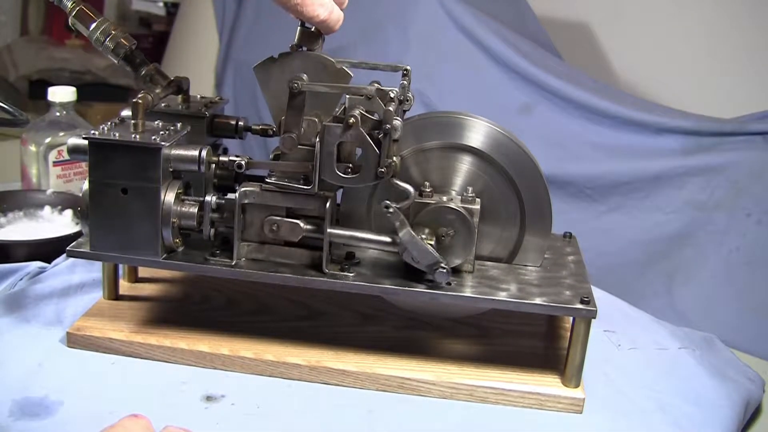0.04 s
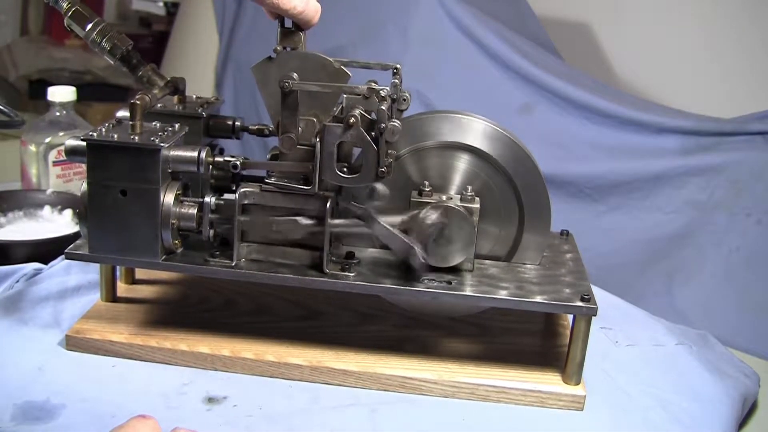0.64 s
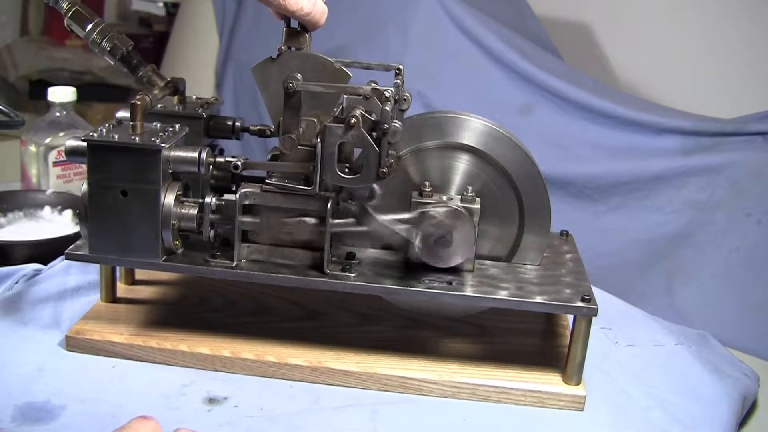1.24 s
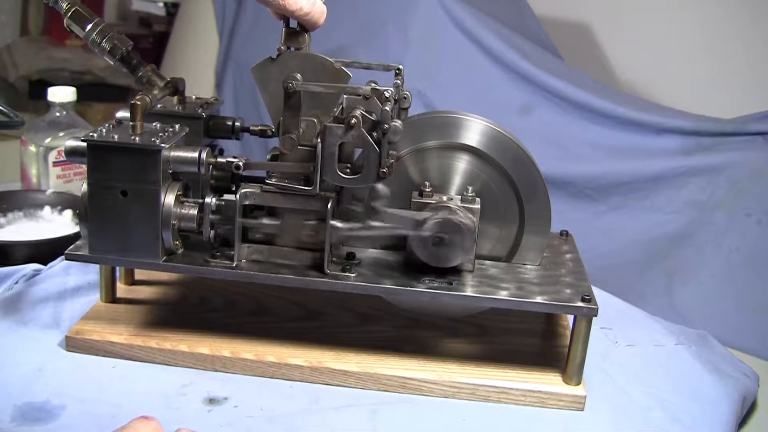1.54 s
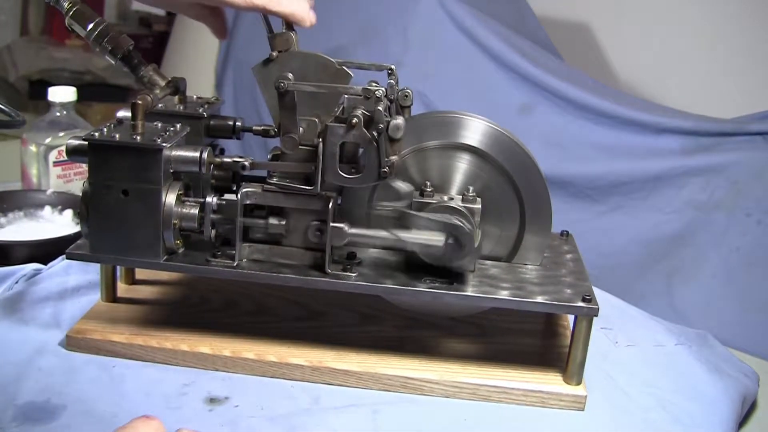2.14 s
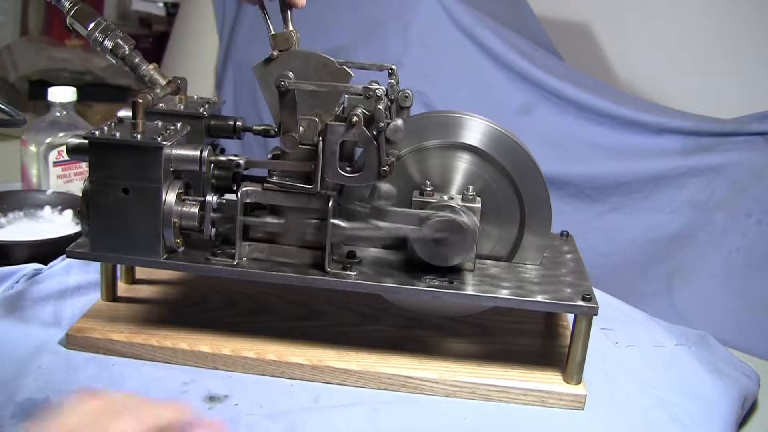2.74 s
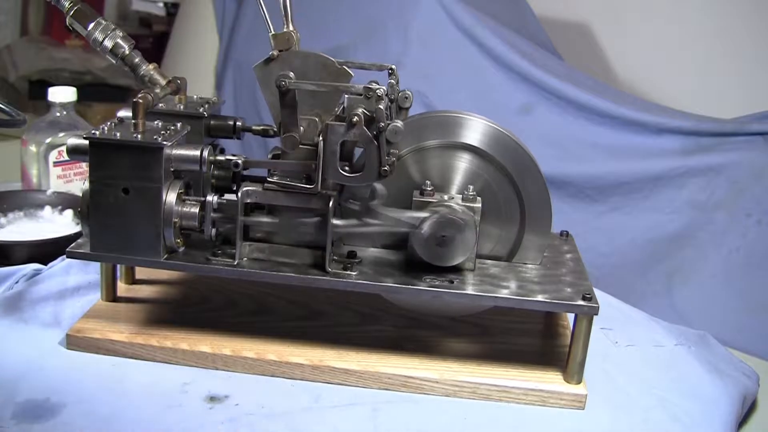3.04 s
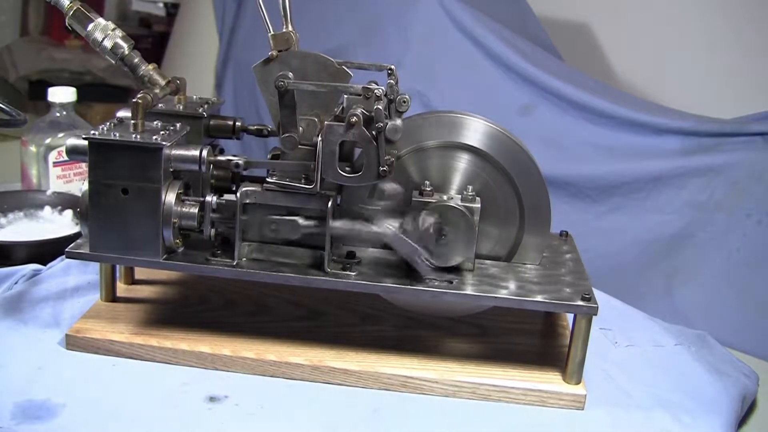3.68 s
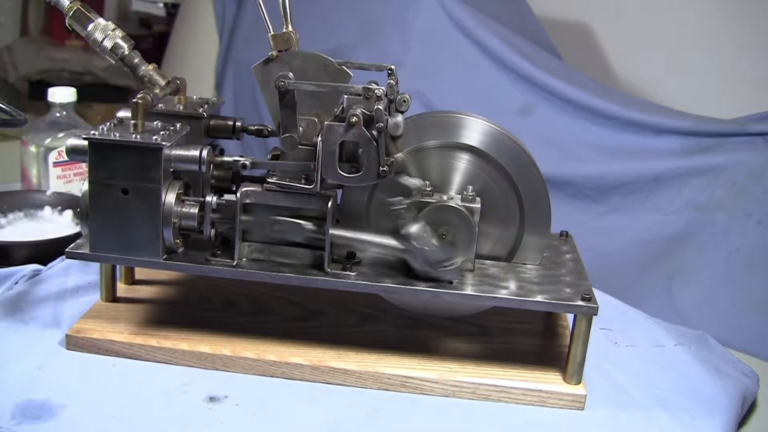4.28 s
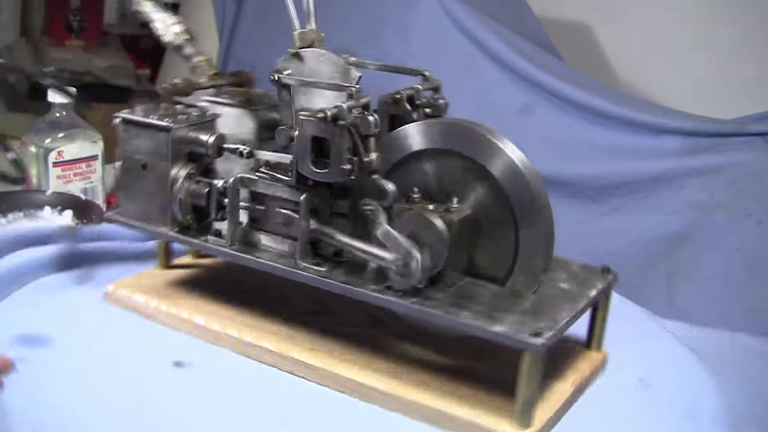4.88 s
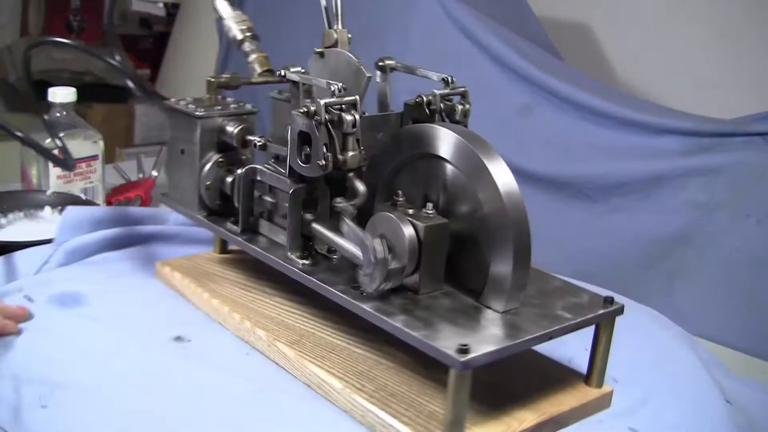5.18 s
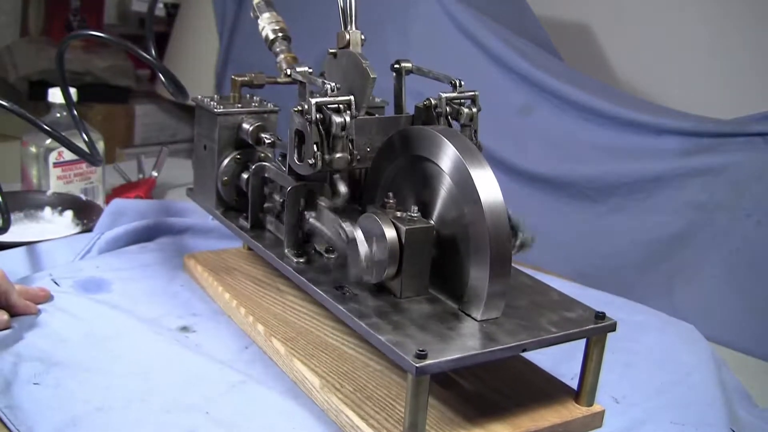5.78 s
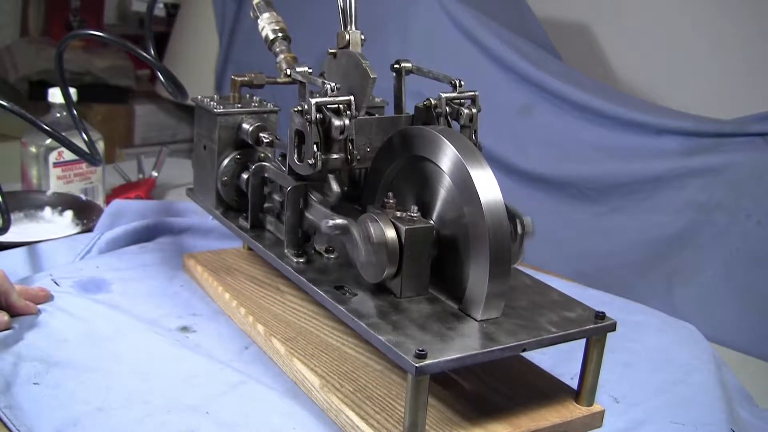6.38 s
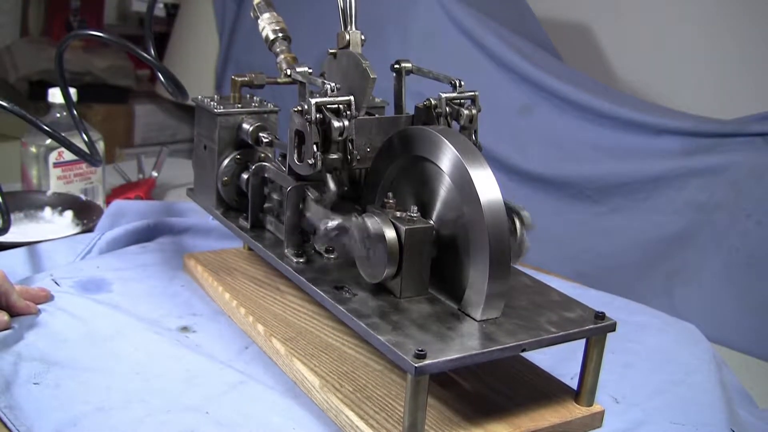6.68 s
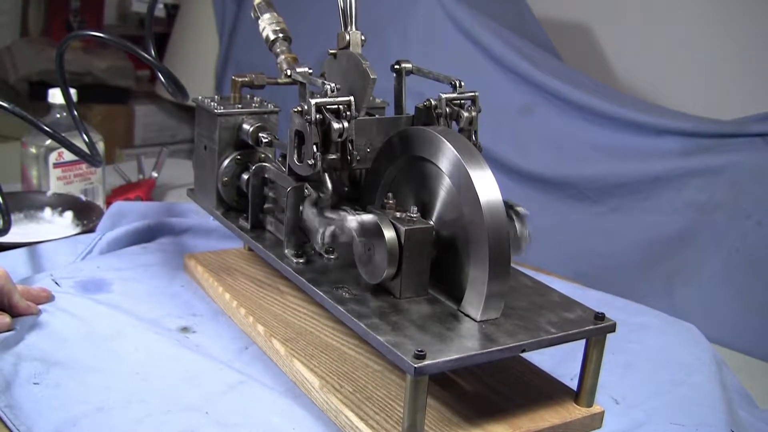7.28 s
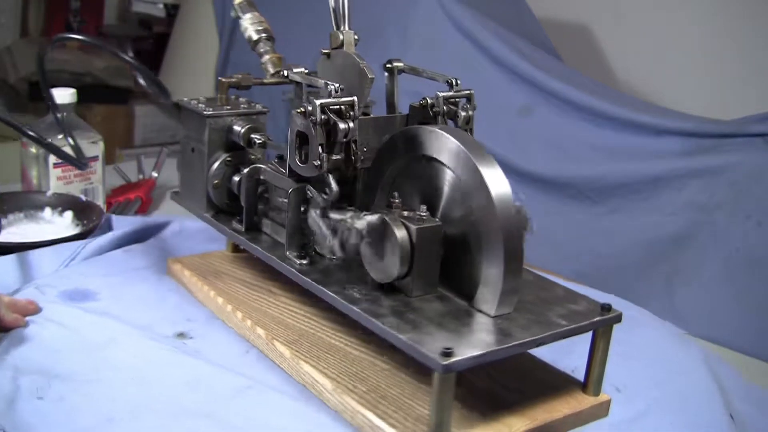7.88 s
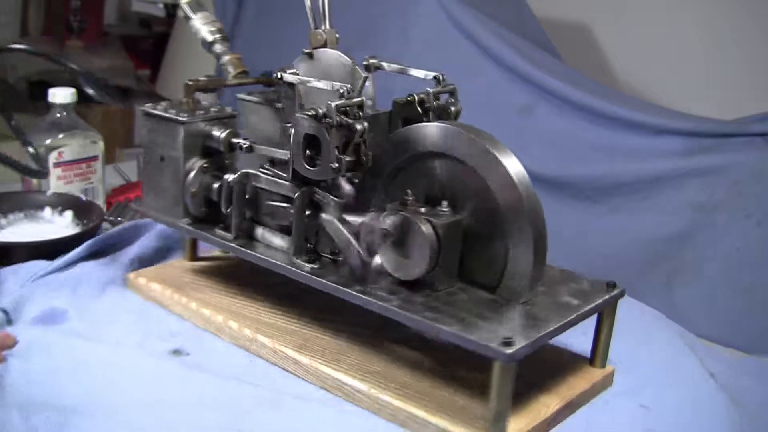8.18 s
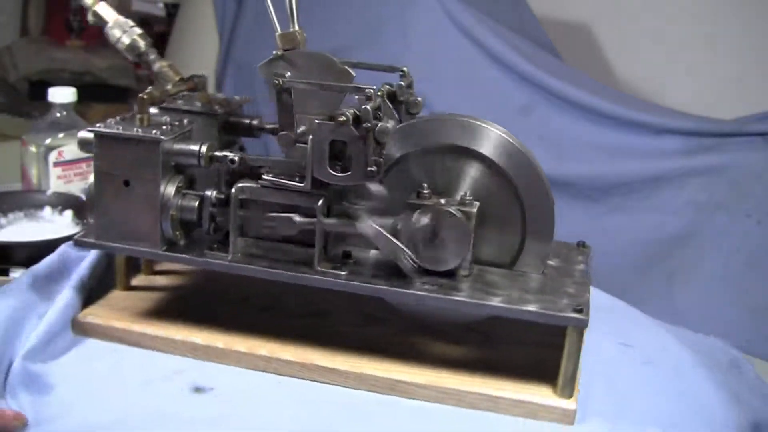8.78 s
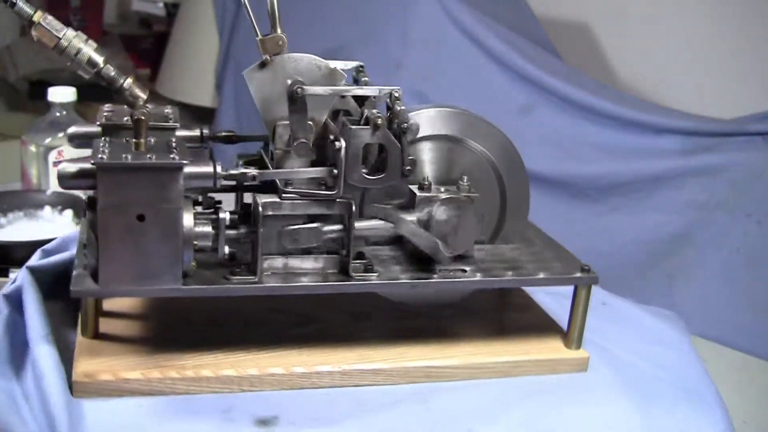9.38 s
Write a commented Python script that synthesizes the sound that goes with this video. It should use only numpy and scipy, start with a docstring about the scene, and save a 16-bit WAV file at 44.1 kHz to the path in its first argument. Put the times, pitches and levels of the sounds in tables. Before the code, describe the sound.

A small steam engine hisses, starts and runs with fast regular chuffs and metallic knocks over a steady steam leak.

```python
"""First comes a hiss: a model steam engine is stalled on a cloth-covered table in a small room.
It twitches once, then starts chuffing and picks up to about 3.5 turns a second. Twice a turn the
exhaust opens with a bark and a fading puff, then snaps shut with a sharp spit. The loose rod knocks
twice a turn too, ringing the metal bed plate under the engine. Dull rubs are heard as the reversing
lever is shifted and, later, as the base is swivelled on the cloth."""
import sys
import numpy as np
from scipy import signal
from scipy.fft import rfft, irfft, next_fast_len
from scipy.io import wavfile
from scipy.ndimage import map_coordinates

SR = 44100
rng = np.random.default_rng(int(sys.argv[2]) if len(sys.argv) > 2 else 0)


def master(y):
    """Save y as 16-bit WAV."""
    cut = np.clip(np.atleast_2d(y).T, -1, 1)
    pcm = np.round(cut * 32767)  # scale
    wavfile.write(sys.argv[1], SR, pcm.astype(np.int16))


N = 420273
T = np.arange(N) / SR
CUTOFF_HZ = 15900
FACING_PIPE_DB = 4   # boost of the exhaust pipe when swivelled fully toward the listener

# The two ends of the cylinder. Each row: puff level in dB, puff fade in dB per second, spit level
# in dB, half the spit's length in turns, squeak share in dB, spray share in dB.
CYLINDER_ENDS = [(-21.5, 174, -10, 0.0082, -5, -8.5), (-20.5, 149, -12.2, 0.014, -11, -10)]
# The stalled piston's one twitch: opening time in seconds, shutting time in seconds, puff level in dB.
TWITCH = (0.022, 0.117, -24)


def from_db(db):
    """Turn decibels into a gain."""
    return 10 ** (np.asarray(db) / 20)


def rms_one(x):
    """Scale a signal to an average power of one."""
    return x / np.sqrt(np.mean(x ** 2) + 1e-20)


def level(rows):
    """A gain that follows rows of time in seconds and level in dB."""
    return from_db(np.interp(T, *np.transpose(rows)))


def cut(x, hz, kind, order=2):
    """Keep the "low" or the "high" side of a frequency."""
    return signal.sosfilt(signal.butter(order, min(hz, .45 * SR), kind, fs=SR, output="sos"), x)


def wander(hz, count=N):
    """A random wobble, mostly slower than hz."""
    return rms_one(cut(rng.standard_normal(count), hz, "low"))


def noise(colour):
    """Noise with a given colour (its strength at each frequency), fading below the lowest row."""
    hz, db = np.transpose(colour)
    size = next_fast_len(N)
    f = np.maximum(np.fft.rfftfreq(size, 1 / SR), 1)
    gain = from_db(np.interp(np.log(f), np.log(hz), db)) * np.minimum(f / hz[0], 1) ** 2
    return rms_one(irfft(rfft(rng.standard_normal(size)) * gain, size)[:N])


def flutter(rate_hz, depth_db):
    """A randomly wavering gain."""
    return rms_one(from_db(depth_db * wander(rate_hz)))


def gate(t, start, end, rise, fall):
    """A gain that opens smoothly at start and dies away after end."""
    opening = np.sin(np.pi / 2 * np.clip((t - start) / rise, 0, 1)) ** 2
    return opening * np.exp(-np.maximum(t - end, 0) / fall)


def around(s):
    """The samples near a moment."""
    return slice(max(int((s - .05) * SR), 0), int((s + .25) * SR))


def jet(colour, likeness):
    """A steam jet is spread out: each ear hears some shared noise and some of its own."""
    shared = np.sqrt(likeness) * noise(colour)
    return shared + np.sqrt(1 - likeness) * np.array([noise(colour), noise(colour)])


def stalled_hiss():
    """Steam blows past the stalled piston until the engine starts."""
    # Each row: time in seconds, level in dB.
    loudness = [(0, -32.5), (.1, -29), (.65, -28), (.73, -59)]
    # Each row: frequency in Hz, strength in dB.
    colour = [(130, -12.5), (900, -5.5), (1700, 4.5), (2600, -1), (4500, -10.5), (7500, 1), (14500, -3)]
    return level(loudness) * jet(colour, likeness=0.51)


def seal_leak():
    """Steam leaks all the time through the seals around the rods."""
    # Each row: time in seconds, level in dB.
    loudness = [(.6, -35.5), (2, -35), (4.5, -36), (5.8, -31.5), (7.8, -31), (8.6, -35)]
    # Each row: frequency in Hz, strength in dB.
    colour = [(60, -33), (130, 0.5), (300, -6), (1100, -2), (1900, 5), (5000, 2), (7300, 8.5), (9800, 0),
              (14500, -1)]
    return level(loudness) * jet(colour, likeness=0.19)


def speed(s):
    """The flywheel's speed: uneven at first, steady once the lever is shifted."""
    # Each row: time in seconds, turns per second.
    speeds = [(0.52, 0.0), (0.72, 3.29), (0.95, 3.38), (1.25, 2.99), (1.42, 2.66), (1.6, 2.98), (1.8, 2.61),
              (2.0, 3.2), (2.4, 3.58), (3.2, 3.58), (4.2, 3.6), (6.0, 3.54), (8.0, 3.46), (9.5, 3.32)]
    return np.interp(s, *np.transpose(speeds))


def at_turn(turns, first_shut_s=.696):
    """The moment when the crank has made this many turns since the first port shut."""
    t = np.arange(N + SR) / SR
    angle = np.cumsum(speed(t)) / SR
    return np.interp(turns + np.interp(first_shut_s, t, angle), angle, t)


def port_timing(end, turn_count=31, lever_shift_s=2.1):
    """The crank angles, in turns, at which one end's port (its steam outlet) opens and shuts."""
    # Each row is one end, in turns: where it shuts, how long it is open before and after the shift.
    valve = [(0, .225, .262), (.503, .22, .23)]
    shuts_at, open_before, open_after = valve[end]
    shuts = np.arange(turn_count) + shuts_at
    return shuts - np.where(at_turn(shuts) < lever_shift_s, open_before, open_after), shuts


def exhaust_strokes():
    """Two strokes a turn. Each row: cylinder end, opening and shutting times in seconds."""
    return [(end, opens, shuts) for end in (0, 1)
            for opens, shuts in zip(*map(at_turn, port_timing(end)))]


def opening_s(opens, turns):
    """The slower the crank, the longer the port takes to open."""
    return turns / max(speed(opens), 1)


def wetness_db(s, cold_db=2.5, drying_s=1.18):
    """Water in the cold cylinder clears as it warms up."""
    return cold_db * np.exp(-s / drying_s)


def swivel(s):
    """How far the exhaust is turned toward the listener."""
    # Each row: time in seconds, share from 0 to 1.
    facing = [(4.7, 0.34), (5.7, 0.86), (8, 0.97), (8.7, 0.16)]
    return np.interp(s, *np.transpose(facing))


def sliding(strokes, lead_s=0.036, idle_db=-11, thrum_hz=136):
    """The sliding parts rumble and the table thrums, most while steam drives the piston."""
    # Each row: time in seconds, level in dB at full push.
    rumble_levels = [(.1, -44), (.2, -48), (.55, -44), (1.4, -35.5), (1.8, -42), (2.3, -38), (4.5, -38.5),
                     (6, -34.5), (8, -35), (9.53, -39)]
    thrum_levels = [(.5, -49.5), (1.4, -43.5), (5, -52)]
    # Each row: frequency in Hz, strength in dB.
    rumble_colour = [(45, -30), (75, -16), (102, -5.5), (135, 2), (190, -2), (450, -5.5), (1100, -8.5),
                     (2000, -20)]
    push = np.full(N, from_db(idle_db))
    for opens, shuts in [row[1:] for row in strokes] + [TWITCH[:2]]:
        near = around(opens)
        push[near] += gate(T[near], opens - lead_s, shuts, rise=0.045, fall=0.002)
    thrum = rms_one(np.sin(2 * np.pi * thrum_hz * T) * wander(thrum_hz / 6))
    return push * (level(rumble_levels) * noise(rumble_colour) + level(thrum_levels) * thrum)


def barks(strokes, bark_db=-31, hold_s=0.0038):
    """The first rush through a barely open port makes the exhaust pipe give a throaty bark."""
    rush = np.zeros(N)
    for opens in [row[1] for row in strokes] + [TWITCH[0]]:
        near, rise = around(opens), opening_s(opens, turns=0.018)
        db = bark_db + wetness_db(opens) + FACING_PIPE_DB * swivel(opens)
        rush[near] += from_db(db) * gate(T[near], opens, opens + rise + hold_s, rise, fall=.017)
    bright = cut(rng.standard_normal(N), 1400, "high", order=4)
    return rush * rms_one(cut(bright, 2500, "low", order=4))


def whistle(strokes, centre_hz, spread, width_hz):
    """A hollow note of the exhaust passage, on a new pitch with every stroke."""
    puff = np.searchsorted(sorted(opens for _, opens, _ in strokes), T)
    pitch = centre_hz * np.exp(spread * rng.standard_normal(len(strokes) + 1))[puff]
    return rms_one(np.sin(2 * np.pi * np.cumsum(pitch) / SR) * wander(width_hz))


def puffs(strokes, trim_db=-1, pipe_db=-16, port_db=-9, facing_db=3, spread_db=1.36, wet_loss=0.76):
    """A jet leaves the open port, sounds the pipe and port, and fades as the cylinder empties."""
    # Each row: frequency in Hz, strength in dB.
    colour = [(400, -8), (1100, -11), (1850, 1), (2600, 0.5), (3600, -1), (5000, -4.5), (6200, -0.5),
              (7300, 11), (8300, 0), (9800, -6.5), (11700, -1), (14800, -8.5)]
    jets = [(*TWITCH, CYLINDER_ENDS[1][1])]
    for end, opens, shuts in strokes:
        db, fade = CYLINDER_ENDS[end][:2]
        db += facing_db * swivel(opens) - wet_loss * wetness_db(opens)
        jets.append((opens, shuts, db + spread_db * rng.standard_normal(), fade))
    flow = np.zeros(N)
    for opens, shuts, db, fade in jets:
        near, rise = around(opens), opening_s(opens, turns=0.045)
        emptying = from_db(db + trim_db - fade * np.maximum(T[near] - opens - rise, 0))
        flow[near] += emptying * gate(T[near], opens, shuts, rise, fall=.005)
    pipe_gain = from_db(pipe_db + FACING_PIPE_DB * swivel(T))
    pipe = pipe_gain * whistle(strokes, centre_hz=1850, spread=.05, width_hz=210)
    port = from_db(port_db) * whistle(strokes, centre_hz=7440, spread=0.079, width_hz=94)
    return flow * (jet(colour, likeness=0.2) + pipe + port) * flutter(rate_hz=70, depth_db=-0.87)


def rod_blows(lag_turns=.037, rebound_s=.048, spread_db=2, light_crack_db=-13, light_ring_db=-12):
    """The rod strikes hard at one end of its travel and lightly at the other."""
    # Each row, here and in the result: time in seconds, crack strength in dB, ring strength in dB.
    heavy_force = [(.6, -25.5, -33.5), (1.251, -19, -36), (1.96, -18, -36), (2.25, -20, -31),
                   (2.8, -28, -28.5), (3.1, -22.5, -27.5), (5, -23.5, -26), (5.6, -21, -23.5),
                   (8, -24.5, -23.5), (8.75, -28, -27), (9.35, -24.5, -22.5)]
    s, crack, ring = np.transpose(heavy_force)
    opens, shuts = port_timing(end=0)
    heavy, light = at_turn(opens + lag_turns), at_turn(shuts) + rebound_s
    crack = np.interp(heavy, s, crack) + spread_db * rng.standard_normal(len(heavy))
    ring = np.interp(heavy, s, ring)
    return [*zip(heavy, crack, ring), *zip(light, crack + light_crack_db, ring + light_ring_db)]


def bending_wave(t, top_hz=1700, low_hz=130, sweep_s=0.00496):
    """High notes cross the plate fastest, so a blow arrives as a ragged falling chirp."""
    t = np.maximum(t, 0)
    ragged = np.exp(wander(700, len(t)) / 3)
    hz = (low_hz + (top_hz - low_hz) * np.exp(-t / sweep_s)) * ragged
    return np.sin(2 * np.pi * np.cumsum(hz * (t > 0)) / SR)


def plate(force):
    """The struck bed plate and base ring at their own natural notes."""
    # Each row: frequency in Hz, relative level in dB, seconds to fade by 60 dB.
    notes = [(99, -43, 0.47), (128, -49, 0.25), (166, -11.5, 0.31), (263.4, -6.5, 0.26), (246, -3, 0.21),
             (419.7, -16, 0.18), (449.5, 0, 0.1), (568.4, 2, 0.08), (729, -3.5, 0.039), (823.4, 7.5, 0.056),
             (880, -29, 0.2), (864, -5.5, 0.22), (1020, -48, 0.14), (1278, 0, 0.061)]
    out = np.zeros(N)
    for hz, db, fade_s in notes:
        decay, step = from_db(-60 / (fade_s * SR)), 2 * np.pi * hz / SR
        ringing = signal.lfilter([1, 0, -1], [1, -2 * decay * np.cos(step), decay ** 2], force + 1e-18)
        out += from_db(db) * rms_one(ringing)
    return rms_one(out) * np.std(force)


def knocks(crack_db=6, crack_s=0.0036, thud_s=0.0016, hit_db=28, chatter_db=4.5, chatter_s=0.023):
    """The loose rod takes up its slack with a crack, a thud and a chatter that shakes the plate."""
    cracks, chatter, hits = np.zeros((3, N))
    for s, crack, ring in rod_blows():
        near = around(s)
        t = T[near] - s
        stretch = np.exp(rng.standard_normal() / 10)
        snap = from_db(crack + crack_db) * np.exp(-abs(t) / crack_s)
        thud = from_db(ring) * np.exp(-abs(t) / thud_s)
        cracks[near] += bending_wave(t * stretch) * (snap + thud)
        hits[int((s + crack_s / 2) * SR)] += from_db(ring + hit_db)
        chatter[near] += from_db(ring + chatter_db) * gate(t, 0, crack_s, crack_s, chatter_s)
    ringing = cut(plate(hits + chatter * rng.standard_normal(N)), 1480, "low")
    return cut(cracks + ringing, 140, "high", order=3)


def spits(strokes, squeak_hz=2543, glide_per_s=45, lead_s=.0012,
          burst_db=-2.26, tail_db=-14, facing_db=-0.5):
    """The closing port squeezes wet steam into a burst, a hoarse rising squeak and crackling spray."""
    # Each row: frequency in Hz, strength in dB.
    burst_colour = [(400, -40), (1100, -21), (2600, -10), (3600, -12), (5000, -14), (6200, -5), (7200, 0),
                    (8300, -7), (10000, -17), (14500, -14)]
    burst, squeak, spray = np.zeros((3, N))
    for end, _, shuts in strokes:
        spit_db, width_turns, squeak_db, spray_db = CYLINDER_ENDS[end][2:]
        near = around(shuts)
        t, width = T[near] - shuts, width_turns / speed(shuts)
        db = spit_db + facing_db * swivel(shuts)
        tail = from_db(tail_db) * gate(t, 0, width, width, fall=0.011)
        burst[near] += from_db(db + burst_db) * (np.exp(-(t / width) ** 2) + tail)
        hz = squeak_hz * np.exp(.14 * rng.standard_normal())   # no two squeaks are alike
        glide = glide_per_s * np.clip(t + lead_s, -2 * width, 2 * width)
        pitch = hz * np.exp(glide + .22 * wander(1200, len(t)))
        wet = from_db(db + wetness_db(shuts)) * np.exp(-((t + lead_s) / width) ** 2)
        squeak[near] += from_db(squeak_db) * wet * np.sin(2 * np.pi * np.cumsum(pitch) / SR)
        spray[near] += from_db(spray_db) * wet
    crackle = rng.standard_normal(N) * flutter(rate_hz=830, depth_db=8)
    droplets = rms_one(cut(cut(crackle, 10500, "high"), CUTOFF_HZ, "low"))
    return burst * jet(burst_colour, likeness=0.24) + squeak + spray * droplets


def rubbing():
    """The lever rubs dully as it is shifted; later the base drags on the cloth."""
    # Each row: middle in seconds, half the length in seconds, level in dB.
    rubs = [(2.082, 0.1, -36), (5.182, 0.16, -33.5)]
    # Each row: frequency in Hz, strength in dB.
    colour = [(150, -9), (385, 3), (1500, -22)]
    return sum(from_db(db) * np.exp(-((T - s) / half) ** 4) for s, half, db in rubs) * noise(colour)


def room(x, leftward, tail_db, left_db, lead_s=.00006, fade_s=0.13):
    """The nearer ear hears the sound earlier and louder; the room's short echo follows."""
    t, out = T[:SR // 2], []
    for sound, side in zip(np.broadcast_to(x, (2, N)), (.5, -.5)):
        tail = rms_one(rng.standard_normal(len(t)) * from_db(-60 * t / fade_s)) / np.sqrt(len(t))
        direct = map_coordinates(sound, [np.arange(N) + side * leftward * lead_s * SR], order=3)
        echoes = signal.fftconvolve(sound, cut(tail, 740, "high", order=1))[:N]
        out.append(from_db(side * leftward * left_db) * (direct + from_db(tail_db) * echoes))
    return np.array(out)


def scene():
    """Steam sounds come from the cylinder on the left, knocks and rubs from near the middle."""
    # How far left the cylinder stands, from 0 to 1: first side on, then fully swivelled.
    left_shares = (0.82, 0.49)
    leftward = np.interp(swivel(T), [0, 1], left_shares)
    strokes = exhaust_strokes()
    steam = stalled_hiss() + seal_leak() + barks(strokes) + puffs(strokes) + spits(strokes)
    body = sliding(strokes) + knocks() + rubbing()
    return room(steam, leftward, tail_db=-6.5, left_db=5.5) + room(body, leftward, tail_db=-10, left_db=1)


def record(dry):
    """Clip any peaks beyond full scale and remove the highest treble."""
    treble_cut = signal.ellip(10, .1, 70, CUTOFF_HZ, fs=SR, output="sos")
    return signal.sosfilt(treble_cut, np.clip(dry, -1, 1))


dry = scene()
out = record(dry)
master(out)
```